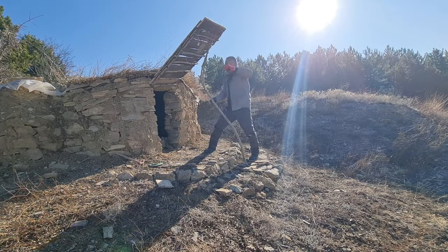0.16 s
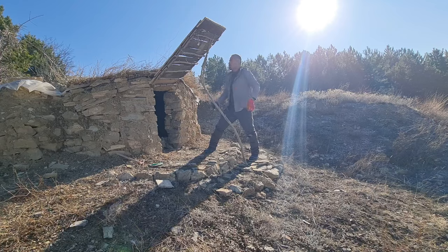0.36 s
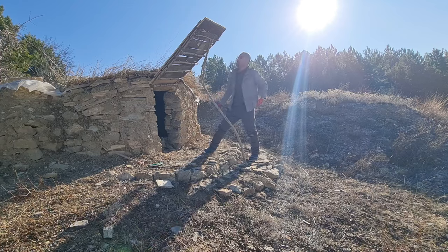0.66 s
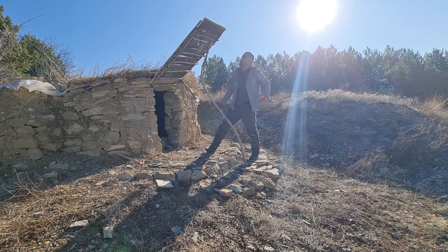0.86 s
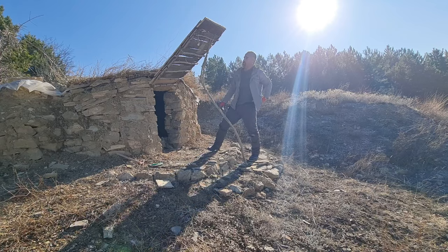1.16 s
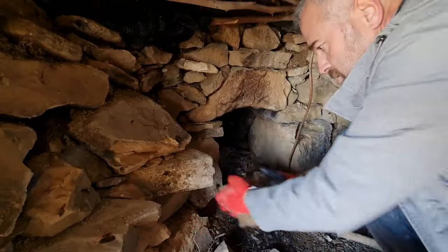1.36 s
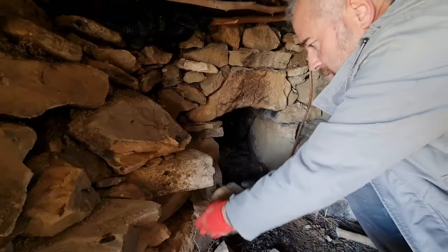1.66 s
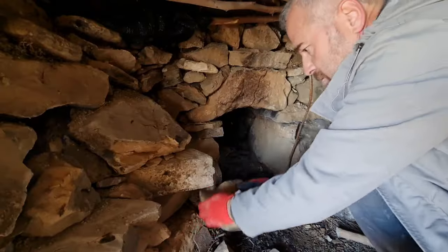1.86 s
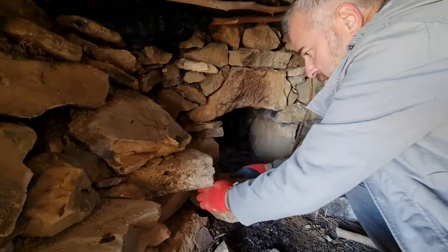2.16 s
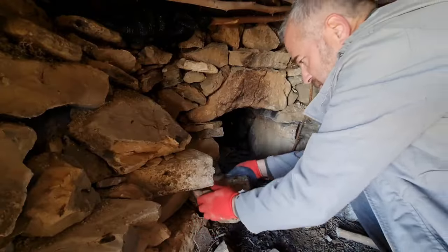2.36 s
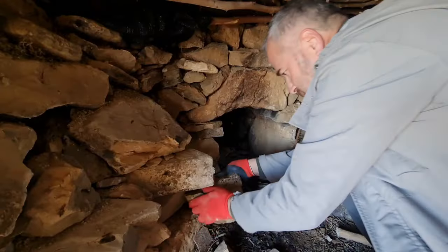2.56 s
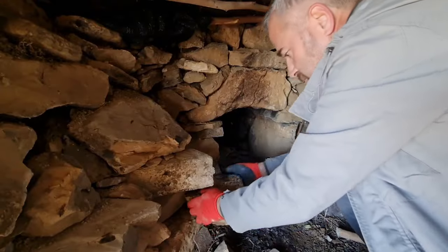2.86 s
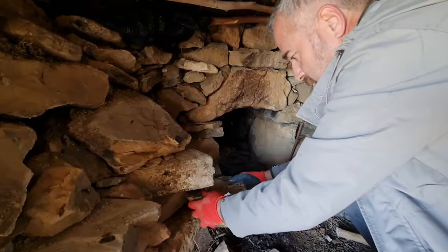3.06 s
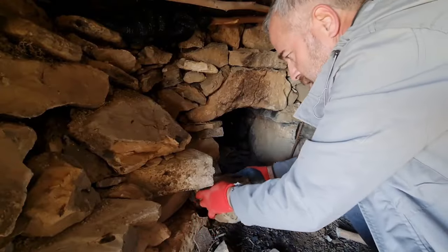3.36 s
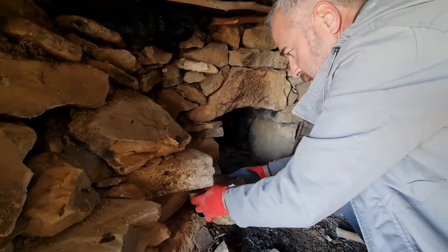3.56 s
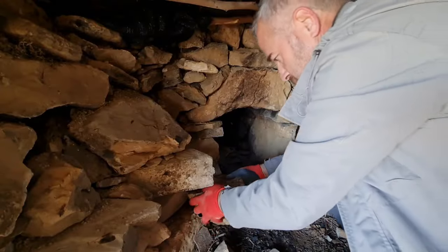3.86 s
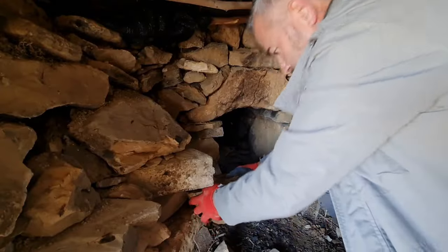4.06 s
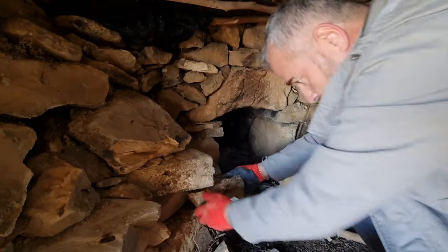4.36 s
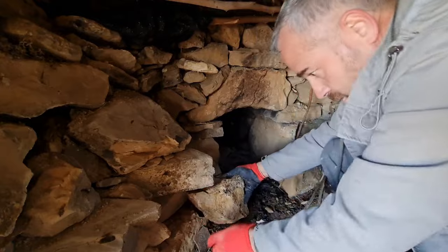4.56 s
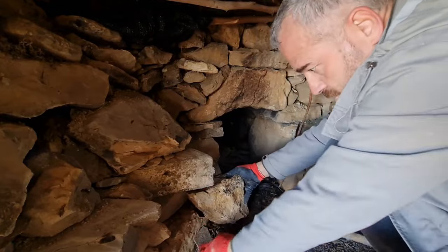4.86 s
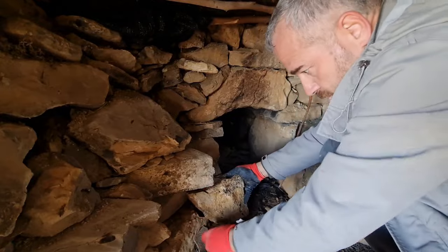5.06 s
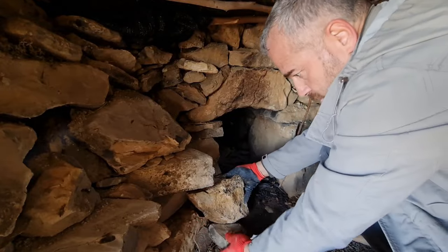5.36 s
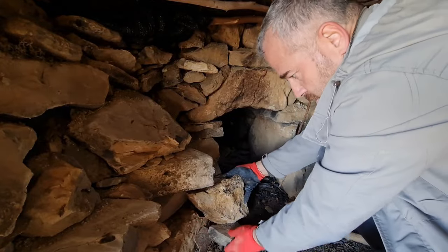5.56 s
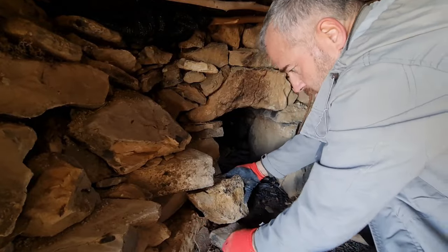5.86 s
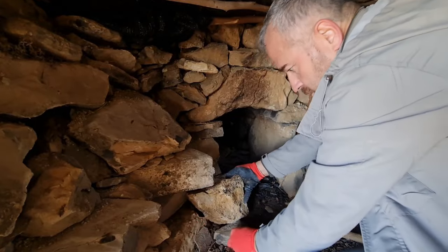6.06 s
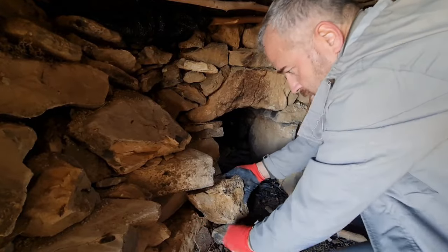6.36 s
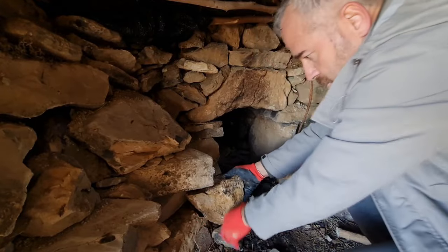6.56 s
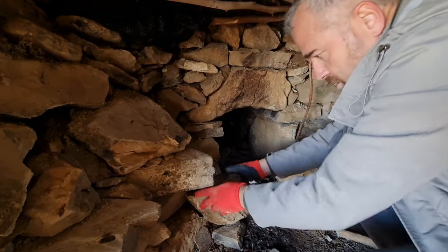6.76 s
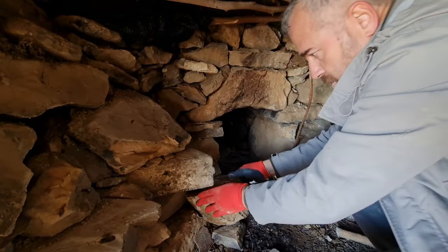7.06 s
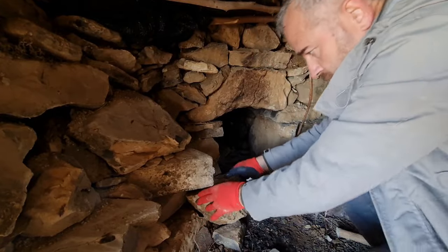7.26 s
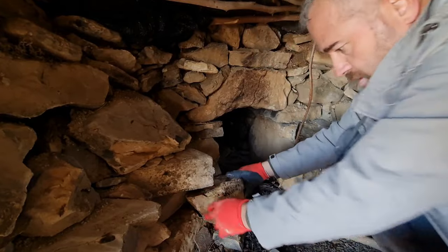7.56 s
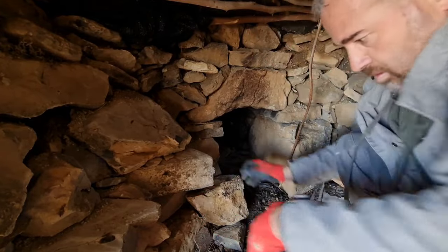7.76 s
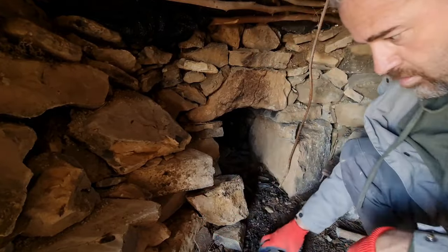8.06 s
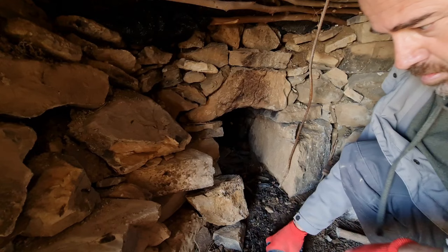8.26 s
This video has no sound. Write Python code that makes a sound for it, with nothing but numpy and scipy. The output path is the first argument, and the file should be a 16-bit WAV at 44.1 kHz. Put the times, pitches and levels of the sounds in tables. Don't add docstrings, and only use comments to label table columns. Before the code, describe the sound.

Loose stones thud, crack and scrape as gloved hands seat them inside a tight dry-stone shelter, jacket cloth rustling close by.

```python
import sys
import numpy as np
from scipy import signal
from scipy.fft import rfft, irfft
from scipy.io import wavfile
from scipy.ndimage import uniform_filter1d

SR = 44100
rng = np.random.default_rng(int(sys.argv[2]) if len(sys.argv) > 2 else 0)


def store_wav(level_fs):
    pcm = np.round(np.clip(np.atleast_2d(level_fs), -1, 1) * 32767)
    wavfile.write(sys.argv[1], SR, pcm.T.astype(np.int16))


def nominal_scale(level):
    x = np.asarray(level, float) / 20
    return 10 ** x


N = 370440
INSIDE_S = 1.207
PORT_LAG_S = 0.00039
REST_HILL_DB, REST_HUT_DB = -86.5, -74.5


def evened(x):
    return x / np.sqrt(np.mean(x ** 2) + 1e-20)


def read(points, hz):
    f, value = np.transpose(points)
    return np.interp(np.log(hz + 1), np.log(f + 1), value)


def bump(t, s, length):
    return np.exp(-((t - s) / (.5 * length)) ** 2)


def add(mix, s, sound, pan_db, lag_s):
    for port, late, side in zip(mix, (0, lag_s), (.5, -.5)):
        part = port[round((s + late) * SR):][:len(sound)]
        part += nominal_scale(side * pan_db) * sound[:len(part)]


# frequency in Hz, likeness from -1 to 1.
PORT_LIKENESS = [(60, 0.98), (150, 1), (380, -0.26), (950, 0.72), (2380, 0.22), (5980, 0.12),
                 (15000, -0.41)]
# frequency in Hz, lead in radians.
PORT_LEAD = [(0, -5.5), (1210, 2.5), (3880, 5), (5250, 4), (6290, -10.5), (7840, -3), (14100, -27.5),
             (16000, -15)]


def noise(colour, level_db, tilt_db=None, pan_db=0, alike=1, patchy_db=2., flicker_db=0.0, size=512):
    hop = size // 4
    t, hz = np.arange(N // hop + 5) * hop / SR, np.fft.rfftfreq(size, 1 / SR)
    a, b, c, d, patches = rng.standard_normal((len(t), len(hz), 5)).T
    patches = evened(uniform_filter1d(uniform_filter1d(patches, size=8, axis=0), size=12, axis=1))
    flicker = evened(uniform_filter1d(rng.standard_normal(len(t)), size=3))
    same = np.clip(alike * read(PORT_LIKENESS, hz), -1, 1)[:, None]
    left = a + 1j * b
    shared = same * left * np.exp(-1j * read(PORT_LEAD, hz))[:, None]
    right = shared + np.sqrt(1 - same ** 2) * (c + 1j * d)
    closed = colour + [(colour[-1][0] * 1.1, -99)]
    shape = nominal_scale(read(closed, hz)[:, None] + patchy_db * patches + flicker_db * flicker)
    if tilt_db is not None:
        shape = shape * nominal_scale(tilt_db(t, hz[:, None]))
    spectra = np.array([left, right]) * shape
    x = evened(signal.istft(spectra, nperseg=size, noverlap=size - hop)[1][:, :N])
    return x * nominal_scale(level_db + np.outer([.5, -.5], pan_db * np.ones(N)))


def wave(hz, length, glide, skew):
    u = np.arange(0, length, 1 / SR) / length
    turns = np.cumsum(hz * (1 + glide * (.5 - u))) / SR
    return np.sin(np.pi * u ** skew) ** 2 * np.sin(2 * np.pi * turns)


def detunings(count):
    return rng.uniform(-1, 1, (count, 6)) * [0, 1, 1, 1, 1, 1]


def ring(modes, hz, t60, focus, shift, turn=0):
    t = np.arange(0, focus + 1.2 * t60, 1 / SR) - focus
    x = 0
    for (ratio, db), r in zip(modes, shift):
        decay = nominal_scale(db - 60 * ratio ** 0.4 * np.maximum(t, 0) / t60)
        x = x + decay * np.cos(2 * np.pi * (hz * ratio * (1 + 0.098 * r) * t + turn))
    x = x * np.cos(.5 * np.pi * np.minimum(t, 0) / focus) ** 2
    return x / abs(x).max()


def swells(rows, rest_db, t):
    power = nominal_scale(2 * rest_db * np.ones(len(t)))
    for s, db, rise, fall in rows:
        away = np.where(t < s, (s - t) / max(rise, .01), (t - s) / max(fall, .01))
        power = power + nominal_scale(2 * (db - 22.5 * np.minimum(away, 3) ** 1.57))
    return 10 * np.log10(power)


# peak in seconds, level in dB, rise in seconds, fall in seconds.
STROKES = [(.22, -77, 0.072, 0.12), (.5, -78.5, 0.48, 0.66), (1.496, -55, 0.66, 0.065),
           (1.565, -60.5, .07, 0.1), (2.03, -55, 0.15, 0.091), (2.0, -64.5, .7, 2.3),
           (2.7, -72, 0.32, 0.75), (2.89, -58.5, 0.19, 0.045), (3.7, -65.5, 0.17, 0.93),
           (4.03, -55, 0.1, 0.074), (4.25, -61, 0.27, 0.14), (4.44, -60.5, 0.15, 0.078),
           (4.75, -64, 0.82, 0.52), (5.2, -62, 0.25, 0.21), (5.49, -61.5, 0.16, 0.087),
           (5.76, -62, 0.43, 0.15), (5.89, -65.5, 0.052, 0.089), (6.02, -62.5, 0.07, 0.27),
           (6.642, -59, 0.49, 0.26), (7.22, -57.5, 0.086, 0.051), (6.83, -66, .12, 0.13),
           (7.05, -70.5, 0.13, 0.25), (7.65, -65.5, 0.97, 0.98), (7.8, -52, 0.021, 0.15),
           (7.875, -48.5, 0.11, 0.11), (7.95, -52.5, 0.21, 0.035), (8.25, -66, 0.92, 1.8)]
# middle in seconds, drop in dB, length in seconds.
PAUSES = [(3.09, -7.5, 0.072), (3.0, -2.5, .1), (7.4, -4, .05), (6.925, -2, 0.061), (7.29, -1.5, 0.045)]


def effort(t):
    hill = swells([r for r in STROKES if r[0] < INSIDE_S], REST_HILL_DB, t)
    inside = swells([r for r in STROKES if r[0] > INSIDE_S], REST_HUT_DB, t)
    still = sum(db * bump(t, s, length) for s, db, length in PAUSES)
    return np.where(t < INSIDE_S, hill, inside) + still


# frequency in Hz, density in dB per Hz.
WIND_COLOUR = [(10, 0.5), (30, -7), (50, -7.5), (80, -14), (200, -35.5)]
# frequency in Hz, density in dB per Hz.
GROUND_COLOUR = [(26, -44), (45, -5), (80, 7), (94, -3.5), (113, -9.5), (157, -11.5), (204, -46),
                 (260, -19), (340, -55), (570, -120)]
# frequency in Hz, density in dB per Hz.
HUM_COLOUR = [(110, -34), (180, -5.5), (195, -2.5), (240, -22), (320, -8.5), (364, -6.5), (582, -12),
              (910, -18), (1340, -18.5), (1570, -24.5), (1760, -27), (2600, -35), (3380, -78), (5720, -120)]
# middle in seconds, level in dB, length in seconds, left over right in dB.
GUSTS = [
    (-0.007, -60, 0.076, -17),
    (0.76, -61, 0.29, -18),
    (6.583, -58.5, 0.69, 13.5),
    (7.242, -58.5, .35, -0.5),
    (7.858, -59, 0.33, 1),
]
# middle in seconds, rumble in dB, length in seconds.
SHIFTS = [
    (4.21, -54.5, 0.4),
    (5.277, -53, 0.69),
    (7.193, -64, 0.96),
]
# middle in seconds, rise of the grind in dB, length in seconds.
DRAGS = [
    (2.897, 14.5, 0.11),
    (6.08, 8.5, 0.22),
    (7.5, 4.5, 0.23),
    (7.92, 3.5, 0.12),
    (7.05, -3, 0.59),
]


def air():
    t, full = np.arange(0, N + 64, 64) / SR, np.arange(N) / SR
    inside = full > INSIDE_S
    wind_db = np.interp(full, t, swells([(s, db, w, w) for s, db, w, _ in GUSTS], -66.5, t))
    pan_db = np.interp(full, t, sum(pan * bump(t, s, w) for s, _, w, pan in GUSTS))
    weight_db = np.interp(full, t, swells([(s, db, w, w) for s, db, w in SHIFTS], -62, t))
    ground_db = np.where(inside, weight_db, -59)
    work_db = uniform_filter1d(np.interp(full, t, effort(t)) - REST_HUT_DB, size=20000)
    hum_db = np.where(inside, -71 + 0.4 * work_db, -70)

    def grind_db(u, hz):
        lift = sum(db * bump(u, s, w) for s, db, w in DRAGS)
        return lift * np.exp(-np.log2((hz + 1) / 450) ** 2)

    wind = noise(WIND_COLOUR, wind_db + 6.5, pan_db=pan_db + 0.5, alike=0.88, patchy_db=-1.0, size=2048)
    ground = noise(GROUND_COLOUR, ground_db + 2.5, pan_db=-1.5, patchy_db=-0.5, flicker_db=-1.6, size=2048)
    hum = noise(HUM_COLOUR, hum_db + 0.36, grind_db, pan_db=-5.5, patchy_db=2.5, flicker_db=1.5, size=1024)
    return wind + ground + hum


# frequency in Hz, density in dB per Hz.
CLOTH_COLOUR = [(530, -20), (900, -6), (991, -29), (1080, -4), (1230, -7), (1320, -4), (1830, -3.5),
                (2070, -4), (2600, -2.5), (4860, -4.5), (6720, -2.5), (8660, -15), (11600, -11.5),
                (16000, -14.5)]
# middle in seconds, length in seconds,
# lift in dB, start in Hz, climb in Hz per second, width in Hz.
WIPE = (7.85, 0.12, 4.9, 3840, 9000, 640)


def rustle():
    t = np.arange(0, N + 64, 64) / SR
    at, span, lift_db, start_hz, climb, width = WIPE

    def tilt_db(s, hz):
        force = np.maximum(effort(s) + 65, -10)
        hill = s < INSIDE_S
        low = np.clip(np.log(2400 / (hz + 1)) / 1.32, 0, 1)
        top = np.clip((hz - 7000) / 1500, 0, 1)
        scrape = low * (10. + 0.02 * force + 3.5) - 0.41 * force * (hz < 960)
        fizz = top * (-11.5 + 1.5 * hill + 9) - 4 * hill * (hz > 7900)
        wipe = lift_db * bump(s, at, span) * np.exp(-((hz - start_hz - climb * (s - at)) / width) ** 2)
        return scrape + fizz + wipe

    grains = nominal_scale(0.42 * evened(uniform_filter1d(rng.standard_normal(N), size=60)))
    level_db = np.interp(np.arange(N) / SR, t, effort(t))
    return noise(CLOTH_COLOUR, level_db + 4.5, tilt_db, -2.75, patchy_db=1.5, flicker_db=1.04) * grains


def crackle():
    t, u = np.arange(N) / SR, np.arange(400) / SR
    level_db = np.interp(t, t[::64], effort(t[::64]))
    chance, kind = rng.random(N), rng.integers(0, 8, N)
    size = np.minimum(rng.exponential(1, N), 3)
    pops = (chance < 70 / SR) * nominal_scale(level_db + 2.2 * size + 1.0)
    x = np.zeros(N)
    for k, hz in enumerate(np.geomspace(1200, 4200, 8)):
        grain = nominal_scale(-60 * u / 0.013) * np.sin(2 * np.pi * hz * u)
        x += signal.oaconvolve(pops * (kind == k), grain)[:N]
    return np.array([x, -.7 * np.roll(x, 9)])


# start in seconds, peak in dB, pitch in Hz.
TICKS = [(1.11, -62, 6050), (1.254, -38.5, 4630), (1.5527, -42, 7400), (1.681, -43.5, 4930),
         (2.829, -56, 6600), (5.457, -58, 5040), (5.543, -48, 6700), (5.8394, -66, 4230),
         (6.0394, -59, 4400), (6.0697, -42.5, 11000), (6.102, -45, 9200), (6.146, -44.5, 4100),
         (6.155, -45, 5220), (6.698, -45.5, 5690), (8.181, -47, 5900), (8.249, -44.5, 5600),
         (8.294, -50, 5840)]


def ticks():
    out, t = np.zeros((2, N)), np.arange(600) / SR
    for (s, db, hz), white in zip(TICKS, rng.standard_normal((len(TICKS), 2, len(t)))):
        band = signal.butter(1, [0.53 * hz, min(1.07 * hz, 16000)], "band", fs=SR)
        fade = nominal_scale(db - 5.5 - 60 * t / 0.016) * (1 - np.exp(-t / 0.00014))
        snap = evened(signal.lfilter(*band, white)) * fade
        add(out[:1], s, snap[0], -1.5, 0)
        add(out[1:], s, 0.25 * snap[0] + snap[1], -1.5, 0)
    return out


# start in seconds, peak in dB, pitch in Hz, length in seconds.
THUDS = [(1.268, -46.5, 77, 0.085), (1.434, -34, 76, 0.078), (1.521, -35, 80, 0.07),
         (1.636, -28, 86, 0.088), (2.031, -30.5, 135, 0.035), (2.052, -38, 110, .031),
         (2.096, -39.5, 61.6, 0.046), (2.237, -40.5, 94.4, 0.064), (2.522, -28, 78, 0.067),
         (2.612, -22.5, 87, 0.06), (2.872, -50, 74.5, 0.082), (3.266, -34.5, 87, 0.051),
         (3.662, -42, 81, 0.055), (4.045, -34.5, 58.4, 0.036), (4.104, -33.5, 70, 0.12),
         (4.233, -37, 79, 0.059), (5.078, -44, 79, 0.084), (5.169, -50.5, 123.6, 0.098),
         (5.479, -35.5, 93.4, 0.067), (5.959, -43, 102, 0.05), (6.123, -45, 78.6, 0.097),
         (6.388, -44, 96, 0.075), (7.194, -32.5, 90, 0.048), (7.339, -27, 83, 0.056), (7.841, -49, 56, .06),
         (7.985, -50, 72, 0.067), (8.039, -50, 70, 0.041)]
# start in seconds, peak in dB, pitch in Hz, length in seconds.
HEAVES = [
    (1.52, -44, 40, 0.096),
    (2.643, -45.5, 39.7, 0.12),
    (4.055, -36.5, 27, 0.14),
    (4.142, -36.5, 32, 0.11),
]


def thuds():
    out = np.zeros((2, N))
    for s, db, hz, length in THUDS:
        struck = min(abs(s - knock[0]) for knock in KNOCKS) < .015
        fast_db = -7 + 19.5 * np.log2(hz / 88) if struck else -16
        length = np.clip(length, .03, .2)
        slow = wave(hz, length, glide=0.11, skew=0.53)
        fast = wave(137.2, 0.89 * length, glide=0.75, skew=0.44)
        add(out, s, nominal_scale(db) * slow, -2.1, 0)
        add(out, s - .003, nominal_scale(db + fast_db) * fast, -1.1, 0)
    for s, db, hz, length in HEAVES:
        add(out, s, nominal_scale(db) * wave(hz, max(length, .04), glide=0.05, skew=0.64), -2.5, 0)
    return out


# frequency in Hz, level in dB.
SHARD = [(888, 1), (1310, -15), (1600, -3), (3200, -9), (3740, -8.5), (4250, -6), (4800, -9), (5300, -11),
         (5660, -12), (6580, -8), (6900, -17)]
WEDGE = [(890, -0.5), (1370, -9), (1550, 2.5), (2090, -7), (2570, -4), (3060, -2), (3400, -7), (4860, -5.5),
         (5470, -7.5), (6160, -9), (7200, -12)]
PEBBLE = [(1400, -1), (1800, -1), (2200, -1)]
BLOCK = [(410, -2), (660, 3), (1400, -3), (1900, -8), (3000, -7)]
GRAVEL = [(2050, 2), (2900, 0), (3400, -2), (4200, -4)]
# start in seconds, level in dB, length in seconds, fade in dB.
SHARD_RUBS = [
    (4.913, -39.5, 0.033, -7),
    (4.967, -44, 0.016, 4),
]
WEDGE_RUBS = [
    (5.168, -42.5, 0.016, -11),
    (5.185, -39.5, 0.032, -9),
]
PEBBLE_RUBS = [
    (8.12, -57.5, 0.022, 0),
    (8.148, -58.5, 0.0163, 0),
]
BLOCK_RUBS = [
    (1.482, -53, .037, -2),
    (2.57, -59, 0.0366, 5),
    (1.445, -51.5, 0.027, -8),
    (5.495, -59, .04, 1),
    (5.958, -59, 0.022, -6),
]
GRAVEL_RUBS = [
    (1.455, -53, .025, 0),
    (1.488, -56, 0.0286, -3),
]


def rubs():
    out, t = np.zeros((2, N)), np.arange(3000) / SR
    alike = 0.4
    pairs = ((SHARD, SHARD_RUBS), (WEDGE, WEDGE_RUBS), (PEBBLE, PEBBLE_RUBS), (BLOCK, BLOCK_RUBS),
             (GRAVEL, GRAVEL_RUBS))
    for modes, rows in pairs:
        stone = np.zeros(len(t))
        for hz, db in modes:
            t60 = 0.018 * (1500 / hz) ** 0.35
            stone += nominal_scale(db - 60 * t / t60) * np.sin(2 * np.pi * hz * t)
        for (s, db, length, fade_db), (a, b, c) in zip(rows, rng.standard_normal((len(rows), 3, len(t)))):
            touch = np.clip(np.minimum(t / 0.00051, (length - t) / 0.0025), 0, 1)
            clumps = nominal_scale(4 * evened(uniform_filter1d(c, size=40)))
            slips = touch * nominal_scale(fade_db * t / length) * clumps
            white = np.array([a, alike * a + np.sqrt(1 - alike ** 2) * b])
            pair = signal.oaconvolve(slips * white, stone[None])
            pair = nominal_scale(db) * evened(pair) * np.sqrt(length * SR / pair.shape[1])
            add(out[:1], s, pair[0], -.6, 0)
            add(out[1:], s, pair[1], .6, 0)
    return out


# peak in seconds, peak in dB, pitch in Hz, t60 in seconds.
PINGS = [(.205, -68, 1300, 0.056), (.21, -71, 2510, .06), (.24, -68, 3150, .05), (.55, -69, 1500, .04),
         (.61, -63.5, 1490, .05), (1.0, -73, 1420, .05), (1.111, -72, 3250, 0.015),
         (1.459, -50, 3400, .008), (1.487, -52, 1500, .015), (3.2605, -33, 1140, 0.016),
         (3.2635, -37, 1000, .016), (3.261, -55, 5130, .02), (3.2615, -57, 6100, .012),
         (3.261, -59, 7500, .01), (3.263, -43.5, 550, 0.046), (3.261, -54.5, 2080, .025),
         (3.262, -58, 3200, 0.022), (1.474, -46, 2960, .015), (2.027, -29, 950, 0.02),
         (2.0263, -30.5, 1180, 0.02), (2.027, -46, 1840, .015), (2.885, -49.5, 2050, .025),
         (2.886, -51, 3050, .03), (4.022, -39, 2510, 0.017), (4.026, -42.5, 2890, .025),
         (4.179, -48.5, 1100, .02), (4.785, -50, 2210, .015), (4.786, -52, 3100, .015),
         (4.7855, -51, 5900, .012), (4.808, -53, 1660, 0.037), (4.809, -58, 3350, .015),
         (5.4715, -34, 830, 0.016), (5.4703, -30.5, 1390, .012), (5.482, -33.5, 920, .02),
         (5.953, -38, 1360, 0.018), (6.01, -52.5, 3930, .02), (6.04, -55, 3800, .03),
         (6.15, -61, 3200, .03), (8.101, -53, 2700, 0.018), (8.102, -55, 3300, .02),
         (1.331, -52, 1100, .02), (1.332, -54, 1420, .02), (1.64, -46, 623, .03),
             (2.275, -50, 420, .03), (2.522, -42, 1060, .02), (2.5225, -42, 1450, .02),
             (2.976, -56, 4000, .008), (3.035, -58, 900, .02), (4.03, -42, 596, 0.022),
             (4.042, -47, 450, .025), (4.047, -51, 750, .02), (4.917, -43, 6800, .012),
             (4.913, -34.5, 2900, .01), (5.169, -47, 7400, .012), (5.17, -41, 1600, 0.013),
             (5.335, -57, 1900, 0.0092), (7.197, -46, 620, .03), (8.182, -55, 5700, .012),
             (4.914, -41, 544, .02), (.46, -72, 2600, .04), (.71, -73, 2600, .07)]


def pings():
    out = np.zeros((2, N))
    swell_s = 0.0015
    for s, db, hz, t60 in PINGS:
        ping = ring([(0.98, 0)], hz, max(t60, .005), swell_s, [0])
        add(out, s - swell_s, nominal_scale(db) * ping, -1.2, 0.089 / hz)
    return out


# factor on pitch, level in dB.
EDGE_MODES = [(1, 10), (.78, -5), (1.22, -6), (1.55, -32), (2.1, -4), (2.7, -16)]
# start in seconds, peak in dB, pitch in Hz, grit in dB, chatter in dB.
CLACKS = [
    (2.024, -28, 1320, -24, -13),
    (4.9121, -20.5, 1350, -21, -32),
    (4.94, -32.5, 1150, -24, -26),
    (4.963, -24, 1360, -29, -30),
    (4.9796, -32, 980, -26, -22),
]
# start in seconds, peak in dB, pitch
# in Hz, grit in dB, chatter in dB.
RATTLES = [(1.33, -40, 1950, -25, -7), (1.432, -27.5, 685, -31, -8), (1.474, -46, 2900, -14, -1),
           (1.636, -50, 2000, -13, -3), (1.722, -49.5, 2050, -5.5, -3.5), (2.026, -33, 2240, -25, -9),
           (2.236, -41, 1130, -13, -14), (2.52, -44, 1900, -12, -14), (2.563, -54, 623, -23, -3),
           (2.884, -49, 2180, -2.5, -11.5), (3.191, -54, 1180, -12, -9), (3.2592, -37.5, 1370, -24, -15),
           (3.431, -58.5, 3500, -3, -2), (4.021, -43, 1010, -2, -3.5), (4.177, -43.5, 550, -22, -8),
           (4.211, -48.5, 1040, -22, -1), (4.259, -40.5, 700, -20, -4), (4.784, -49, 1600, -6, -20),
           (4.808, -52, 1670, -10, -20),
           (5.169, -37, 3300, -22, -17), (5.187, -30.5, 1610, -20, -14), (5.196, -31, 1420, -22, -9),
          (5.21, -40, 4900, -20, -7), (5.281, -42.5, 1530, -15, -6.5), (5.335, -50.5, 890, -31, -42),
          (5.377, -58, 790, -19, -3), (5.469, -41.5, 2310, -9, -15), (5.481, -28.5, 1550, -17.5, -20),
          (5.881, -54.5, 1370, -8, -1), (5.952, -38.5, 1350, -40, -13), (6.013, -59, 1300, -3, 5),
          (6.386, -52.5, 640, -10, -3.5), (7.188, -38.5, 560, -20.5, -8.5), (7.319, -58, 1500, 1, 1),
          (8.102, -52, 1110, -7, -8), (8.121, -51, 1460, -13, -12), (8.13, -47, 2180, -8, -12),
          (8.182, -48, 5700, -19, -7)]


def clacks():
    out, size, blows = np.zeros((2, N)), 8192, CLACKS + RATTLES
    white = rng.standard_normal((len(blows), 4, size))
    band = signal.butter(4, [2000, 7300], "band", fs=SR, output="sos")
    crushed = signal.sosfilt(band, white[:, :2])
    bands_db = 2.0 * evened(uniform_filter1d(white[:, 3, :size // 2 + 1], size=70))
    slope_db = -3. * np.log2(np.fft.rfftfreq(size, 1 / SR) / 3000 + .5)
    crushed = irfft(rfft(crushed) * nominal_scale(bands_db + slope_db)[:, None], size)
    crushed += nominal_scale(-24.0) * np.diff(white[:, :2], prepend=0)
    clumps = nominal_scale(2.0 * evened(uniform_filter1d(white[:, 2], size=50)))
    t = np.arange(size) / SR
    rows = zip(blows, detunings(len(blows)), crushed, clumps, white[:, 3])
    for (s, db, hz, grit_db, chatter_db), r, grit, clump, slips in rows:
        t60 = 0.047 * (1300 / hz) ** 0.35
        crack = ring(EDGE_MODES, hz, 7 / hz + 0.0047, 1.29 / hz, r, turn=0.11)
        fade = nominal_scale(db - 60 * t / max(t60, .01)) * (1 - np.exp(-t / 0.0007))
        chatter = evened(signal.oaconvolve(slips * clump, crack)[:size]) * nominal_scale(chatter_db) * fade
        clean = 1 - min(nominal_scale(chatter_db), .8)
        add(out, s, nominal_scale(db + 4.5) * clean * crack, -.6, 0.23 / hz)
        add(out, s + .0008, chatter, -.6, 0.13 / hz)
        tail = evened(grit * clump) * nominal_scale(grit_db + 0.5) * fade
        add(out[:1], s, tail[0] + 1.37 * tail[1], -1.5, 0)
        add(out[1:], s, tail[1] - 1.4 * tail[0], 1.5, 0)
    return out


# factor on pitch, level in dB.
BODY_MODES = [(1.001, 2.5), (.7, -6), (1.35, -15), (1.8, -17.5), (2.5, -14), (3.4, -20)]
# start in seconds, peak in dB, pitch in Hz.
KNOCKS = [(1.429, -33, 352), (1.481, -52, 456), (1.634, -33.5, 475), (1.502, -58, 480), (2.033, -38, 340),
          (2.242, -36.5, 600), (2.517, -33.5, 528), (2.535, -39, 570), (2.587, -50, 420), (2.612, -30, 206),
          (3.26, -38.5, 335), (4.021, -40.5, 330), (4.035, -34, 310), (4.211, -48.5, 364), (4.26, -48, 354),
          (4.911, -38, 574), (4.962, -34, 740), (5.025, -57, 300), (5.171, -38.5, 385), (5.19, -36, 387),
          (5.282, -57, 392), (5.377, -47, 350), (5.469, -41.5, 330), (5.481, -32, 570), (5.489, -39, 450),
          (5.915, -56, 336), (5.952, -42, 710), (6.385, -50.5, 320), (7.188, -39.5, 358), (7.323, -45, 260)]


def knocks():
    out = np.zeros((2, N))
    for (s, db, hz), r in zip(KNOCKS, detunings(len(KNOCKS))):
        t60 = 0.02 - 0.0108 * max(-12.0 - db, 0)
        pan_db = 7 + 0.2865 * db + 2 * np.log2(hz / 400)
        body = ring(BODY_MODES, hz, max(t60, .01), 0.00403, r)
        add(out, s - .001, nominal_scale(db + 3.5) * body, pan_db, PORT_LAG_S)
    return out


# factor on pitch, level in dB.
SLAB_MODES = [(1, 0.5), (1.2, -7), (1.57, -5), (2.6, -23), (3.0, -20), (4.0, -29)]
# peak in seconds, peak in dB, pitch in Hz, upper modes in dB, t60 in seconds.
SLAB_BLOWS = [
    (2.027, -15, 369, -2.5, 0.019),
    (2.2385, -26, 350, 5.5, 0.026),
    (2.523, -18, 372, 13, 0.027),
]


def slab():
    out = np.zeros((2, N))
    swell_s = 0.0049
    for s, db, hz, upper_db, t60 in SLAB_BLOWS:
        modes = [(ratio, level + upper_db * (ratio > 1.4)) for ratio, level in SLAB_MODES]
        blow = ring(modes, hz, max(t60, .01), swell_s, np.zeros(len(modes)))
        add(out, s - swell_s, nominal_scale(db + 1.5) * blow, 1.5, PORT_LAG_S)
    return out


# frequency in Hz, t60 in seconds.
WALLS = [(100, 0.081), (400, 0.098), (1500, 0.048), (6000, 0.069)]


def hut(x):
    taps = np.zeros((2, 8820))
    at = np.arange(100, 8800, 20) + rng.integers(0, 20, (2, 435))
    np.put_along_axis(taps, at, rng.choice([-1., 1.], at.shape), 1)
    hz, t, z = signal.stft(taps, SR, nperseg=256)
    decay = nominal_scale(-60 * t / np.maximum(read(WALLS, hz), .02)[:, None])
    tail = signal.istft(z * decay, SR, nperseg=256)[1]
    return signal.fftconvolve(x, tail / np.linalg.norm(tail[0]), axes=1)[:, :N]


def scene():
    bodies, edges = knocks(), clacks()
    stones = bodies + ticks() + slab() + pings()
    echo = nominal_scale(-5.0) * hut(stones + nominal_scale(-5.5) * edges)
    return stones + edges + echo + thuds() + rustle() + air() + crackle() + rubs()


def low_pass(x):
    return signal.sosfilt(signal.butter(12, 15840, fs=SR, output="sos"), x)


def record(dry):
    return low_pass(dry)


dry = scene()
out = record(dry)
store_wav(out)
```